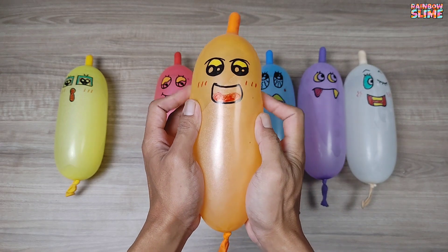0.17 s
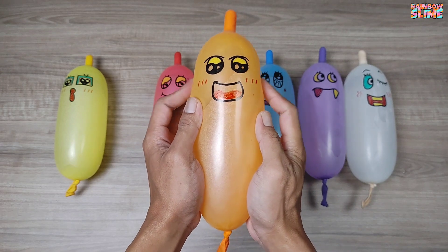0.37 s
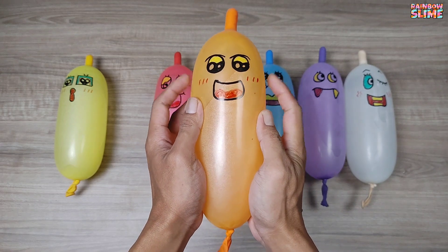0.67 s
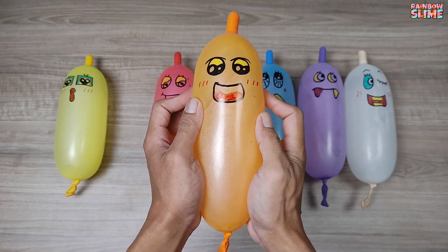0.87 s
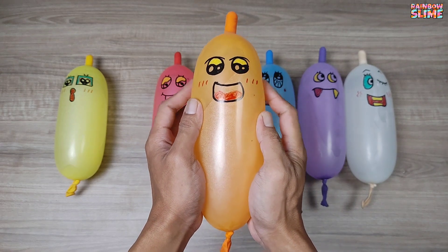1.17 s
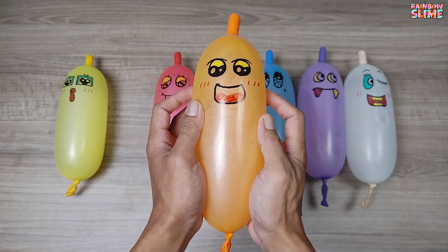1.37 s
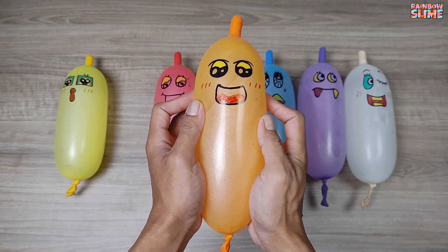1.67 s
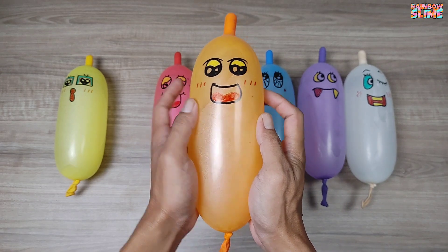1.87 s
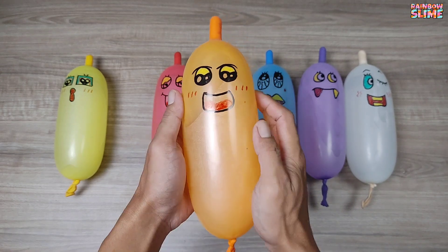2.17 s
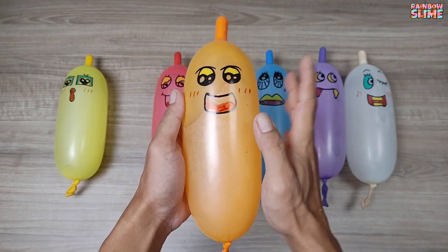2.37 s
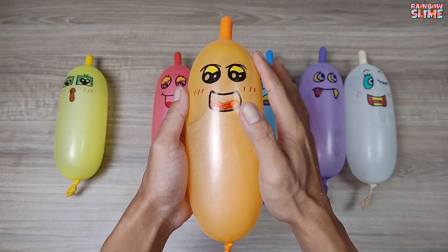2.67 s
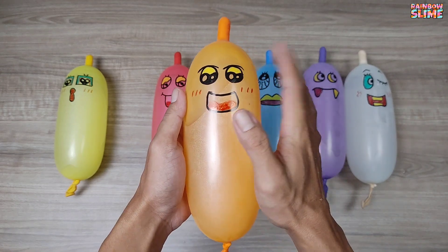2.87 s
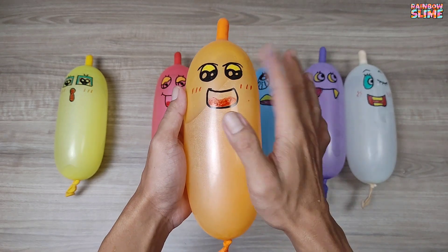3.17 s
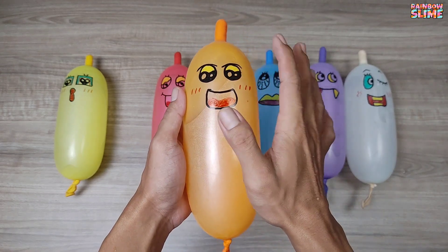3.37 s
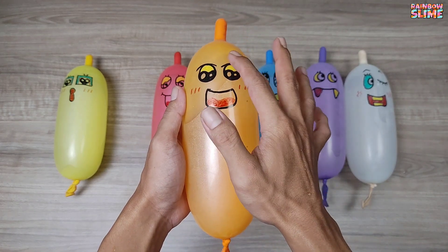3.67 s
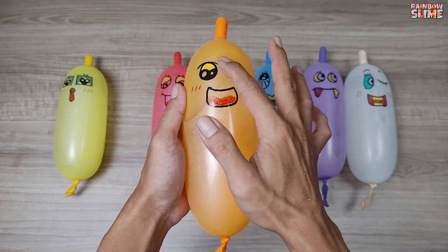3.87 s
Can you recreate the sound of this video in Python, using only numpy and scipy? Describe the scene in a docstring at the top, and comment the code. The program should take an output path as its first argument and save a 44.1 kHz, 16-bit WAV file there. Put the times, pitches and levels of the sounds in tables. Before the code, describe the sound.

A long, air-filled rubber balloon is handled close to the microphone, above a table in a quiet room. Fingers rub it in five short, firm strokes, starting at about 0.1, 0.5, 1.0, 1.4 and 1.7 seconds. Each stroke creaks and judders in rapid slips that spread out as the finger slows, then squeals as it halts, while the air inside rings hollowly. From 2 to 2.5 seconds there are a few small rubbery jerks and a very faint hiss of dry skin as a hand shifts. Four light fingertip taps follow at about 2.8, 3.1, 3.4 and 3.6 seconds, much quieter than the rubbing, each a short, damped, hollow note with a small nail tick. A barely audible touch comes at 3.8 seconds and a faint, thin, brief whistling tone at 4. A short room echo and low room tone lie behind everything.

```python
"""A long, air-filled rubber balloon, rubbed in five strokes and then tapped four times, close to one
microphone above a table in a quiet room. Each stroke judders in slips that space out as the finger
slows, creaks between them and squeals as it halts; every slip snaps the membrane and rings the air
inside. Dry skin hisses faintly when a hand shifts. The table top and the walls answer, and low room
tone lies behind it all, with one faint whistle at the end."""
import sys
import numpy as np
from scipy import signal
from scipy.fft import rfft, irfft
from scipy.io import wavfile

SR = 44100
rng = np.random.default_rng(int(sys.argv[2]) if len(sys.argv) > 2 else 0)


def generate_wav(sig):
    """Save sig (samples, or channels by samples) to the path in sys.argv[1] as 16-bit PCM at SR."""
    pcm = np.round(np.clip(np.atleast_2d(sig).T, -1, 1) * 32767).astype(np.int16)
    wavfile.write(sys.argv[1], SR, pcm)


N = 177458
T = np.arange(N) / SR

# Five firm strokes and three light shifts of a finger:
# (start [s], end [s], creak level [dB], treble [dB], halting squeal [dB], final slip rate [Hz])
SLIDES = [(0.018, 0.045, -41.5, 3, 0, 405.3), (.097, 0.322, -28.5, -5, 15, 264),
          (.549, 0.738, -26.5, -1.5, 14, 327.4), (0.974, 1.111, -26, 1.5, 11, 440),
          (1.369, 1.513, -21, -5, 20.5, 439.8), (1.67, 1.691, -35, -2, 8, 400.7),
          (1.744, 1.919, -20, 0, 20, 439.6), (2.0, 2.088, -47.5, -2.5, 0, 399.4)]
# The run of big slips in each firm stroke:
# (first slip [s], last slip [s], slips [count], gap growth [ratio], level [dB], treble [dB])
SLIP_RUNS = [(.175, 0.3117, 4, 1.023, -16, 2), (0.5863, 0.6413, 4, 1.16, -17.5, 2.5),
             (0.986, 1.0631, 6, 1.09, -16, 0), (1.379, 1.46, 7, 1.17, -17, 1.5),
             (1.7485, 1.882, 11, 1.075, -18, 2)]
# Lone jerks as a finger starts, stops or lets go: (time [s], level [dB], treble [dB])
LONE_JERKS = [(0.172, -31.5, 15), (0.209, -23, -2), (0.657, -15.5, 5.5), (0.6914, -13, 0.5),
              (0.7072, -18.5, 6.5), (0.7287, -16, 6), (.971, -30, -16), (1.08, -19.5, 8), (1.0974, -17, 0),
              (1.127, -23, 7.5), (1.4142, -21.5, 6), (1.473, -18, 3), (1.5031, -18, 6), (1.9029, -16, 0.5),
              (1.913, -15.5, -2), (1.9263, -22, 5.5), (2.018, -30.5, -13), (2.0912, -31.5, -13.5),
              (2.1838, -33.5, 1), (2.4351, -40, -4)]
# How the hands hold the balloon: (time [s], mode shift [Hz], fingertip rasp [dB], bass left free [dB])
GRIP = [(0.298, -3, 13.5, 0.5), (0.649, 14, 13.5, -5), (1.05, 22, 8.5, -6.5), (1.4, 5.5, 8, -10),
        (1.85, 2.5, 11, -15.5)]
# Spectrum of the membrane's dull snap: (frequency [Hz], relative level [dB])
SNAP_SPECTRUM = [(50, -54), (160, -22.5), (260, -14), (330, -13.5), (700, -7), (1250, 2), (1550, -6),
                 (1850, -29.5), (2300, -24.5), (2750, -46.5), (16000, -89.5)]
# Bright resonances of the taut rubber: (centre [Hz], width [Hz], gain [dB])
SQUEAK_BANDS = [(3400, 563, 4.5), (5050, 380, -2), (5650, 350, -4.5), (6764, 477, 0.5), (8464, 600, -11.5),
                (11163, 2100, -23)]
# Air and membrane modes: (frequency [Hz], t60 [s], gain when rubbed [dB], gain when tapped [dB])
BALLOON_MODES = [(150.8, 0.16, -1, -36), (259, 0.58, -9, -24), (326.6, 0.5, -8, -8.5),
                 (409, 0.074, -29, 2.5), (460.5, 0.052, 7, -24), (502.4, 0.024, 11, 11),
                 (677, 0.1, -2, -32), (877, 0.7, -10, -22), (965, 0.13, -4.5, -5.5),
                 (1027, 0.11, -1.5, -1.5), (1148, 0.031, 2, -1.5), (1300, 0.024, -17.5, -7),
                 (1472, .08, -12, -2.5), (1590, 0.045, -19, -7.5), (2294, 0.046, -30, 0)]
# Four taps and two faint touches: (time [s], level [dB], dent pitch [Hz], nail tick [dB],
# tick pitch [Hz], delay of the second contact [s], damping time [s])
TAPS = [(2.796, -34, 960, -10, 3030, .011, 0.063), (3.0863, -35, 1295, -4, 3710, .015, 0.079),
        (3.3771, -35.5, 925, 1, 3320, 0.025, 0.029), (3.619, -54.5, 1110, -9, 3370, .012, 0.041),
        (3.6386, -38.5, 1250, -12.5, 3750, .018, .028), (3.8204, -56, 1350, -13, 3430, .012, .028)]
# Dry skin brushing the rubber: (centre time [s], length [s], level [dB])
BRUSHES = [(2.054, 0.029, -66), (2.145, 0.17, -70), (2.349, 0.071, -70.5), (2.45, 0.019, -70),
           (2.831, 0.021, -67.5)]
# First echoes off table, hands and walls: (delay [s], gain [ratio])
NEAR_ECHOES = [(.00295, 0.41), (0.0115, 0.62), (0.0144, -0.3)]
# Colour and decay of the room's tail: (frequency [Hz], gain [dB], t60 [s])
ROOM_BANDS = [(121, 0.5, 0.96), (329, 8, 0.56), (650, 8, 0.47), (1102, -7.5, 0.84), (2600, -0.5, 0.68),
              (7000, -7, 0.67), (13384, 13.5, 0.15)]
# Spectrum of the room tone: (frequency [Hz], relative level [dB])
ROOM_TONE = [(15, -42.5), (36, -9.5), (72, -21.5), (136, -11.5), (198, -8.5), (246, -12), (1950, -25.5),
             (3000, -29), (3340, -27.5), (4040, -31.5), (5280, -35.5), (6210, -45.5), (11800, -31.5),
             (15500, -39.5)]
# Narrow bands of hum in the room: (frequency [Hz], level [dB])
HUM_BANDS = [(101, -84), (190, -80.5)]


def rubbing(ring_db=-50, groan_db=-44, groan_t60=.056, ripple_db=-39, wander_hz=7, pump_db=2):
    """Each slip snaps the membrane; ripples run on over the rubber and the air inside rings."""
    big = np.vstack([judder(), LONE_JERKS])
    small = creak(big[:, 0])
    times, db, treble_db = np.vstack([big, small]).T
    grip_s, *grip = np.transpose(GRIP)
    shift_hz, rasp_db, bass_db = (np.interp(T, grip_s, column) for column in grip)
    force = impulses(times, undb(db))
    rasp = undb(rasp_db) * butter(force, [2090, 2430], "band")
    dull = palms(snap(force), bass_db) + rasp
    # the fine creak keeps pumping the air, so it groans more than the big slips
    pump = snap(impulses(small[:, 0], undb(small[:, 1])))
    drive = dull + undb(pump_db) * palms(pump, bass_db)
    cavity = sum(undb(ring_db + rub_db) * resonate(drive, hz + shift_hz, t60)
                 for hz, t60, rub_db, _ in BALLOON_MODES)
    # the skin under the finger groans at the rate of the slips
    _, _, slip_hz = sliding(T)
    groan = undb(groan_db) * resonate(drive, slip_hz, groan_t60)
    # ripples come back after a lap of the balloon, on other paths as the fingers move along
    laps = fade(.08) - fade(.01)
    ripples = shifting(dull, lambda: rng.standard_normal(SR // 2) * laps, wander_hz)
    return dull + squeak(times, db + treble_db) + cavity + groan + undb(ripple_db) * ripples


def judder(scatter_db=2.2, brighten_db=1, afterslip_s=.0022, afterslip_db=-6.5):
    """Runs of big slips whose gaps lengthen as the finger slows; a weaker slip trails each one."""
    slips = []
    for first, last, count, growth, db, run_treble_db in SLIP_RUNS:
        count = int(round(count))
        size_draw, delay_draw, after_draw = rng.standard_normal((count, 3)).T
        elapsed = np.append(0, np.cumsum(growth ** np.arange(count - 1)))
        progress = elapsed / elapsed[-1]
        times = first + (last - first) * progress
        soft_start_db = -1.5 * np.exp(-np.arange(count) / .96)
        size_db = db + soft_start_db + scatter_db * size_draw
        treble_db = run_treble_db + brighten_db * (progress - .5)
        slips += zip(times, size_db, treble_db)
        after_times = times + afterslip_s * np.exp(.3 * delay_draw)
        slips += zip(after_times, size_db + afterslip_db + 2 * after_draw, treble_db)
    return slips


def creak(big_times, jitter=.36, count=1000, stick_s=.0047, stick_db=-4.5):
    """Small uneven slips between the big ones: the longer the skin sticks, the more it lets go."""
    gap_draw, treble_draw = rng.standard_normal((count, 2)).T
    gaps = np.exp(jitter * gap_draw)
    _, _, slip_hz = sliding(T)
    times = np.interp(np.cumsum(gaps), np.cumsum(slip_hz) / SR, T)
    size_db, treble_db, _ = sliding(times)
    # the creak dips while the skin sticks before a big slip
    wait = big_times - times[:, None]
    stuck = np.exp(-np.where(wait > 0, wait, np.inf).min(axis=1) / stick_s)
    size_db = size_db + stick_db * stuck + 20 * np.log10(np.tanh(gaps / 2))
    return np.column_stack([times, size_db, treble_db + 2 * treble_draw])


def sliding(t, start_hz=472, sag_db=-7.5, attack_s=.0067, release_s=.0055, lead_s=.025, halt_s=.039):
    """Creak level, treble and slip rate at times t: a slide slows, weakens and squeals as it halts."""
    start, end, db, treble_db, squeal_db, end_hz = np.transpose(SLIDES)
    k = np.searchsorted((end[:-1] + start[1:]) / 2, t)  # the nearest slide
    progress = np.clip((t - start[k]) / (end[k] - start[k]), 0, 1)
    envelope = np.exp(-np.maximum(start[k] - t, 0) / attack_s - np.maximum(t - end[k], 0) / release_s)
    size_db = db[k] + sag_db * progress + 20 * np.log10(envelope + 1e-9)
    halting = np.exp(-((t - end[k] + lead_s) / halt_s) ** 2)
    slowing = np.sin(np.pi / 2 * progress ** 1.3) ** 2
    slip_hz = start_hz + (end_hz[k] - start_hz) * slowing
    return size_db, treble_db[k] + squeal_db[k] * halting, slip_hz


def snap(force, late_hz=1150, width_hz=480):
    """The membrane snaps; its waves near one pitch arrive late and draw the pulse out to a few cycles."""
    pulses = convolve(force, compact_pulse(SNAP_SPECTRUM))
    _, allpass = signal.iirpeak(late_hz, late_hz / width_hz, fs=SR)
    return signal.lfilter(allpass[::-1], allpass, pulses)


def squeak(times, db, jerk_db=-6, break_db=-4):
    """A slip breaks loose and runs on for a millisecond in tiny jerks; both ring the taut rubber."""
    pole = np.exp(-1 / (.0003 * SR))
    energy = impulses(times, undb(db) ** 2) + 1e-18
    power = signal.lfilter([(1 - pole) ** 2], [1, -2 * pole, pole ** 2], energy)
    jerks = undb(jerk_db) * np.sqrt(power) * rng.standard_normal(N)
    force = undb(break_db) * impulses(times, undb(db)) + jerks
    return sum(undb(gain_db) * butter(force, [hz - width / 2, hz + width / 2], "band")
               for hz, width, gain_db in SQUEAK_BANDS)


def palms(x, bass_db, shelf_hz=420):
    """The closer the palms lie, the less the whole membrane can heave."""
    return x + (undb(bass_db) - 1) * butter(x, shelf_hz, "low", order=1)


def tapping(ring_db=-8, patch_db=-9, crack_db=-8, thud_db=-10, ripple_db=-27):
    """A fingertip dents the membrane, rings the modes near the dent's pitch and damps them; nails tick."""
    out = np.zeros(N)
    for time, db, dent_hz, tick_db, tick_hz, damp_s in contacts():
        blow = impulses([time], undb(db))
        damping = np.exp(-(T[:SR // 2] / damp_s) ** 2)
        modes = sum(undb(tap_db) / np.hypot(1, 2 * np.pi * np.log(hz / dent_hz)) * ring(hz, t60)
                    for hz, t60, _, tap_db in BALLOON_MODES)
        body = undb(ring_db) * modes + undb(patch_db) * ring(dent_hz, t60=.15)
        burst = rng.standard_normal(SR // 2) * fade(.026)
        crack = butter(butter(burst, 1600, "high"), 7000, "low")
        tick = .5 * ring(tick_hz, t60=.014) + undb(crack_db) * crack
        dent = butter(snap(blow), .47 * dent_hz, "high", order=1)  # weak well below its pitch
        ripples = convolve(dent, rng.standard_normal(SR // 2) * damping * fade(.2))
        ringing = convolve(blow, body * damping + undb(tick_db) * tick)
        out += ringing + undb(thud_db) * dent + undb(ripple_db) * ripples
    return butter(out, 130, "high")


def contacts(second_db=-4, second_tick_db=-10):
    """Every tap lands twice in quick succession, the second time softer and with less nail."""
    for time, db, dent_hz, tick_db, tick_hz, delay_s, damp_s in TAPS:
        yield time, db, dent_hz, tick_db, tick_hz, damp_s
        yield time + delay_s, db + second_db, dent_hz, tick_db + second_tick_db, tick_hz, damp_s


def brushing(band_hz=(1200, 7500), grain=.74):
    """Dry skin brushes the rubber in soft swells of grainy hiss."""
    swell = sum(undb(db) * np.exp(-2 * ((T - time) / length) ** 2) for time, length, db in BRUSHES)
    grains = rng.standard_normal(N) * np.exp(grain * rng.standard_normal(N))
    return swell * unit(butter(grains, band_hz, "band", order=1))


def room(x, wet_db, sway_hz=.698):
    """At the microphone: direct sound, near echoes, then a tail that changes as the balloon sways."""
    echoes = convolve(x, impulses(*np.transpose(NEAR_ECHOES)))
    near = butter(echoes, 2840, "low", order=1)  # hands and cloth take the treble
    return x + near + undb(wet_db) * shifting(x, room_tail, sway_hz)


def room_tail(build_s=.016):
    """One second of diffuse sound off the walls that builds up quickly and lasts longest in the bass."""
    hz, db, t60 = np.transpose(ROOM_BANDS)
    t = T[:SR]
    noise = rfft(rng.standard_normal(SR))
    log_hz = np.log(np.arange(SR // 2 + 1) + 1)
    bands = [irfft(noise * np.interp(log_hz, np.log(hz), share)) for share in np.eye(len(hz))]
    tail = sum(undb(db[k]) * band * np.exp(-np.log(1000) * t / t60[k]) for k, band in enumerate(bands))
    return tail * (1 - np.exp(-(t / build_s) ** 2)) / np.sqrt(SR / 20)


def whistle(peak_s=4.0, length_s=.036, hz=2541, db=-72):
    """A faint, thin tone swells briefly in the background."""
    return undb(db) * np.exp(-2 * ((T - peak_s) / length_s) ** 2) * np.sin(2 * np.pi * hz * T)


def room_tone(air_db=-70.5):
    """The steady noise of the quiet room, with a faint hum."""
    air = unit(irfft(rfft(rng.standard_normal(N)) * colour(ROOM_TONE, N), N))
    hum = sum(undb(db) * unit(butter(rng.standard_normal(N), [hz - 2, hz + 2], "band"))
              for hz, db in HUM_BANDS)
    return undb(air_db) * air + hum


def resonate(x, hz, t60):
    """Drive a mode whose pitch moves."""
    turn = np.exp(2j * np.pi * np.cumsum(hz) / SR)
    pole = np.exp(-np.log(1000) / (t60 * SR))
    return np.imag(turn * signal.lfilter([1], [1, -pole], x / turn))


def shifting(x, draw_response, rate_hz):
    """Pass a sound through a response that turns from one pattern of paths to another."""
    return sum(np.cos(2 * np.pi * rate_hz * T + phase) * convolve(x, draw_response())
               for phase in (0, np.pi / 2))


def compact_pulse(points, size=2048):
    """The minimum-phase pulse with this spectrum, peak 1."""
    cepstrum = irfft(np.log(colour(points, size)))
    cepstrum[1:size // 2] *= 2
    cepstrum[size // 2 + 1:] = 0
    pulse = irfft(np.exp(rfft(cepstrum)))
    return pulse / np.abs(pulse).max()


def colour(points, size):
    """Gain on the bins of a transform, from points of (frequency [Hz], level [dB])."""
    hz, db = np.transpose(points)
    return undb(np.interp(np.log(np.fft.rfftfreq(size, 1 / SR) + 1), np.log(hz), db))


def ring(hz, t60):
    """One decaying mode."""
    return np.sin(2 * np.pi * hz * T[:SR // 2]) * fade(t60)


def fade(t60):
    """Half a second of exponential decay."""
    return np.exp(-np.log(1000) * T[:SR // 2] / t60)


def impulses(times, sizes):
    """One impulse at each time."""
    out = np.zeros(N)
    np.add.at(out, np.clip(np.asarray(times) * SR, 0, N - 1).astype(int), sizes)
    return out


def convolve(x, response):
    """Pass a sound through an impulse response."""
    return signal.fftconvolve(x, response)[:N]


def butter(x, hz, kind, order=2):
    """Plain low-, high- or band-pass."""
    return signal.sosfilt(signal.butter(order, hz, kind, fs=SR, output="sos"), x)


def undb(db):
    """Decibels to gain."""
    return 10 ** (np.asarray(db) / 20)


def unit(x):
    """Scale to rms 1."""
    return x / np.sqrt(np.mean(x ** 2))


def scene():
    """Balloon and hands at one microphone; the damped taps stir the room less."""
    strokes = room(rubbing() + brushing(), wet_db=-3.5)
    taps = room(tapping(), wet_db=-6.5)
    return (strokes + taps + whistle() + room_tone())[None]


def record(dry):
    """The recorder cuts the top steeply above 15.6 kHz."""
    return signal.sosfilt(signal.ellip(10, .1, 70, 15600, fs=SR, output="sos"), dry)


dry = scene()
out = record(dry)
generate_wav(out)
```